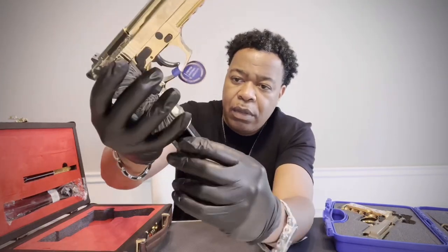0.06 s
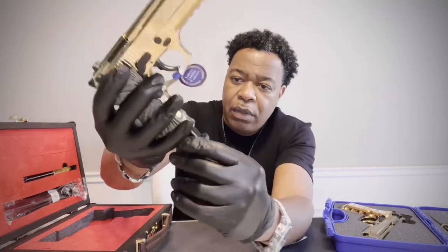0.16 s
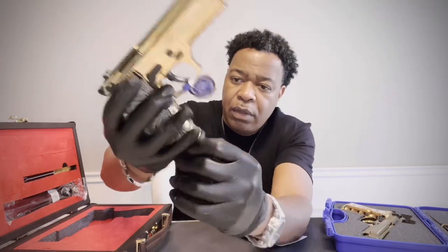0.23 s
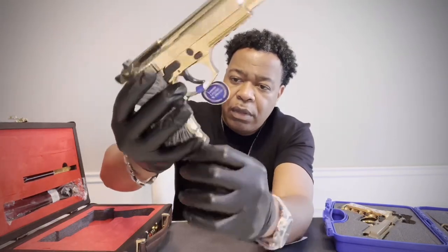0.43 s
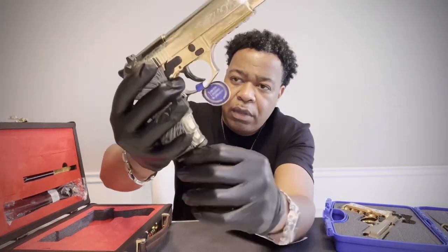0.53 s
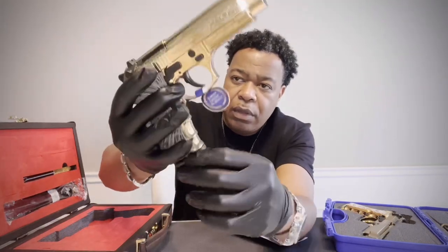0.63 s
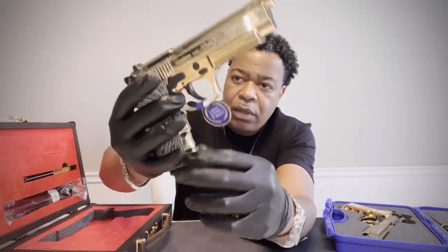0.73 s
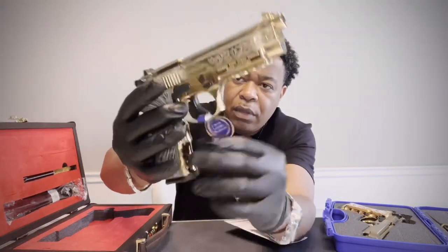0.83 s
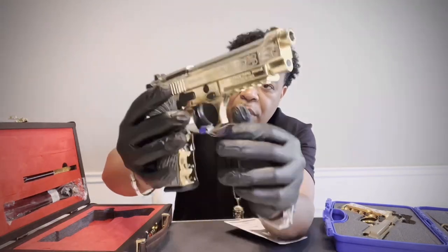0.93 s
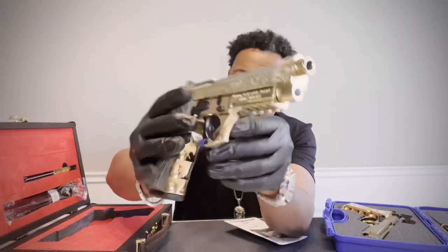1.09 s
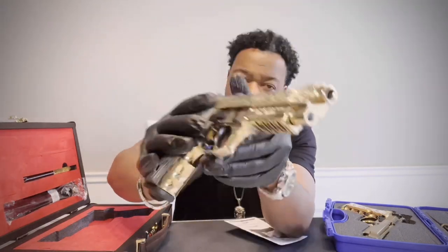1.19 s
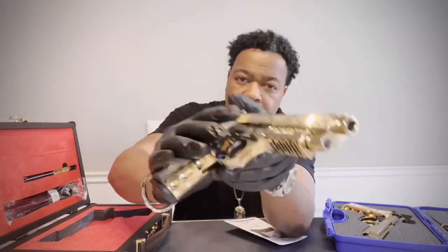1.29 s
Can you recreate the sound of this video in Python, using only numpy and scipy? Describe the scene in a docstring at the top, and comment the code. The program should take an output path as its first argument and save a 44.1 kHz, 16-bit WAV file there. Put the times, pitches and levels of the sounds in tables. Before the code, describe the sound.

Sharp metal double clack of a pistol's magazine, with gloves rubbing softly in a room.

```python
"""Gloves rub softly on metal over a low hum and a faint hiss on the left: a pistol is handled close by.
Its magazine ticks in the grip, catches with a sharp double clack and knocks once more.
Each impact of steel on steel cracks and excites the pistol's modes, which the hand damps quickly,
while the thin magazine rings on. The walls of a bare, lively room answer every click."""
import sys
import numpy as np
from scipy import signal
from scipy.io import wavfile

SR = 44100
rng = np.random.default_rng(int(sys.argv[2]) if len(sys.argv) > 2 else 0)


def dump(signal):
    """Clip the signal to [-1, 1] and save it as 16-bit WAV at the path in sys.argv[1]."""
    limited = np.clip(np.atleast_2d(signal).T, -1, 1)
    pcm = np.round(limited * 32767).astype(np.int16)
    wavfile.write(sys.argv[1], SR, pcm)


N = 59535

# Background rumble. Each row: frequency in Hz, relative spectral density in dB.
RUMBLE_SPECTRUM = [(25, -16.5), (60, -1.5), (100, -4), (180, -4.5), (300, -8), (450, -21), (800, -26.5),
                   (3000, -36), (9000, -28), (15000, -48)]
# Tones of the hum. Each row: frequency in Hz, level in dB.
HUM_TONES = [(59.2, -73.5), (118.4, -79.5), (208.5, -74), (262, -79.5), (322, -80.5)]
# Course of the hiss. Each row: time in seconds, level in dB.
HISS_LEVELS = [(0, -76.5), (.62, -77.5), (.68, -68), (.78, -70), (.86, -74), (.95, -74.5), (1.03, -80),
               (1.12, -79), (1.2, -68), (1.35, -70)]
# Likeness of the two channels in diffuse sound. Each row: frequency in Hz, correlation from -1 to 1.
STEREO_CORRELATION = [(60, 0.87), (250, 0.096), (1000, 0.092), (2500, -0.034), (5000, 0.0048),
                      (8500, -0.44), (14000, 0.42)]
# Course of the gloves' rubbing. Each row: time in seconds, level in dB.
RUB_LEVELS = [(0, -58), (.04, -65.5), (.08, -65.5), (.16, -60), (.22, -48.5), (.5, -70), (.7, -84.5),
              (.8, -76), (.95, -70.5), (1.03, -87.5), (1.115, -80), (1.145, -66), (1.21, -74), (1.35, -72)]
# Quick slips of a glove. Each row: start in seconds, level in dB, rise and decay in seconds.
GLOVE_SLIPS = [(0.721, -59, 0.015, 0.05), (.92, -69, .02, 0.055), (1.128, -63, 0.012, 0.066)]
# Friction noise of rubs and of slips. Each row: frequency in Hz, relative spectral density in dB.
RUB_SPECTRUM = [(400, -14.5), (1000, -1.5), (2500, 2.5), (4000, -1), (6000, 0), (8000, -12.5), (9800, -7.5),
                (12500, -21.5), (14500, -17.5)]
SLIP_SPECTRUM = [(1000, -4), (3000, -12), (4800, 5), (6300, 9), (8000, -18), (9800, 12), (12500, -32),
                 (14500, -6)]
# Near walls. Each row: delay in seconds, gain in dB, left minus right in dB.
WALL_ECHOES = [(0.0111, -11.5, 3.5), (0.0162, -13.5, 4)]
# Reverberation. Each row: frequency in Hz, gain in dB, T60 in seconds, left minus right in dB.
REVERB_BANDS = [(294, 11.5, 0.41, -2), (650, 10, 0.54, 1), (1160, -7, 0.46, 0), (2150, 0.5, .68, -1),
                (3077, 4.5, 0.52, -0.5), (4300, 2, 0.59, 3), (5470, -2, .58, 7), (7493, 4, 0.55, -0.5),
                (9950, -2.5, .45, -1), (12690, -17, .36, 0), (14500, -10.5, 0.21, -1)]
# Modes of the magazine. Each row: frequency in Hz, gain in dB, T60 in seconds.
MAGAZINE_MODES = [(960, -33.5, .5), (2700, -25.5, 0.45), (2866, -21, .5), (3010, -22, 0.59),
                  (3380, -22, .5), (3549, -19.5, .5), (3960, -23, .6), (4420, -26, 0.38), (4500, -24, 0.61),
                  (4990, -26, 0.8), (4880, -21, .5), (5540, -20, 0.65), (6580, -25, .5)]
# Modes of the held pistol. Each row: frequency in Hz, gain in dB, T60 in seconds, left minus right in dB.
PISTOL_MODES = [(707, -20.5, 0.014, -4), (982, -16, 0.0067, 2.5), (1250, -12, .014, 4),
                (1659, -11, 0.0139, 1), (2317, -15, 0.014, -6), (2773, -12, 0.011, 11),
                (3210, -12, 0.005, 10.5), (3934, -5, 0.0075, 9.5), (4615, -7.5, 0.0065, 9),
                (5268, -3.5, 0.0042, 12), (6975, -12, 0.0033, 6.5), (9120, -19, 0.0068, -2.5),
                (9780, -9, 0.00924, 2), (14300, -12, 0.015, -6)]
# Steel impacts. Each row: time in seconds, level in dB, bass and treble gains in dB, two favoured
# pitches (each in Hz, then its lift in dB), chatter decay in seconds, chatter gain in dB.
IMPACTS = [(0.0930, -45.5, 10, -2, 4160, 8.1, 1083, 11.1, 0.0017, 7),
           (0.156, -52.5, 10.5, -10, 5540, 4.5, 3600, 4.9, 0.013, 2),
           (0.209, -54, 8, -8, 1650, 10.4, 2320, 7.7, 0.0013, 5),
           (0.2298, -32.5, 2.5, 1, 5350, 5.5, 2280, 4.4, .0010, 8),
           (0.2446, -23, -4.5, 2, 4610, 3.5, 3280, 3, 0.00077, -0.5),
           (0.5097, -49, 12, -11, 5290, 4.74, 2200, 7.1, 0.0054, -3)]

IMPACT_SCALE = np.sqrt(SR / 100)   # an impulse with the energy of 10 ms at rms 1
FIRST_TOUCH_S, FIRST_TOUCH_DB = .0006, -17.5   # lead and level against the main blow
BASS_HZ, BODY_HZ, TREBLE_HZ = 1022, 3330, 10200
CRACK_DB, CRACK_LOW_HZ = -7, 1500
ROOM_CRACK_DB = 8.5   # the crack spreads to the walls more strongly than the ring
TIME = np.arange(N) / SR


def from_db(db):
    """Amplitude grows tenfold for every 20 dB."""
    return 10 ** (np.asarray(db) / 20)


def unit_rms(x):
    """Normalisation to a mean power of 1."""
    return x / np.sqrt(np.mean(x ** 2) + 1e-20)


def unit_energy(x):
    """Normalisation to a mean energy of 1 per channel."""
    return unit_rms(x) / np.sqrt(x.shape[-1])


def pan(db):
    """A level difference, left minus right, gives a sound its direction."""
    return from_db(np.array([[db], [-db]]) / 2)


def level_curve(rows):
    """An amplitude envelope, interpolated in decibels."""
    return from_db(np.interp(TIME, *np.transpose(rows)))


def at_hz(rows, hz):
    """Interpolation of a table's columns on a logarithmic frequency axis."""
    frequencies, *columns = np.transpose(rows)
    return [np.interp(np.log(hz), np.log(frequencies), column) for column in columns]


def drift(rate_hz):
    """Random modulation: Gaussian values joined by straight lines."""
    return np.interp(TIME * rate_hz, np.arange(4096), rng.standard_normal(4096))


def delayed(x, delay_s):
    """Propagation delays a sound without changing its shape."""
    return np.pad(x, ((0, 0), (int(delay_s * SR), 0)))[:, :N]


def resonance(force, hz, t60):
    """A damped oscillator, whose free vibration falls 60 dB in t60 seconds."""
    radius = from_db(-60 / (t60 * SR))
    feedback = [1, -2 * radius * np.cos(2 * np.pi * hz / SR), radius ** 2]
    return signal.lfilter([1, 0, -1], feedback, force + 1e-18)


def noise_bands():
    """Partly correlated stereo noise in third octaves; yields each centre in Hz and its band."""
    edges = 22 * 2 ** (np.arange(30) / 3)
    white = rng.standard_normal((2, 2, N + SR // 2))
    for k, (low, high) in enumerate(zip(edges, edges[1:])):
        bandpass = signal.butter(2, [low, high], "band", fs=SR, output="sos")
        mid, side = signal.sosfilt(bandpass, white[k % 2])[:, -N:]
        hz = np.sqrt(low * high)
        alike = np.clip(at_hz(STEREO_CORRELATION, hz)[0], -1, 1)
        yield hz, np.sqrt((1 + alike) / 2) * mid + np.sqrt((1 - alike) / 2) * side * [[1], [-1]]


def coloured_noise(spectrum):
    """Spectral shaping: weighted bands add up to stereo noise of rms 1."""
    return unit_rms(sum(from_db(at_hz(spectrum, hz)[0]) * band for hz, band in noise_bands()))


def rumble(level_db=-64.5):
    """Stationary noise, densest at low frequencies, forms the room's background."""
    return from_db(level_db) * pan(db=2.5) * coloured_noise(RUMBLE_SPECTRUM)


def hum(waver_db=2.5):
    """Slow amplitude modulation makes each low tone waver."""
    tones = np.zeros(N)
    for hz, db in HUM_TONES:
        amplitude = np.sqrt(2) * from_db(db + waver_db * drift(rate_hz=7))
        tones += amplitude * np.sin(2 * np.pi * (hz * TIME + rng.random()))
    return pan(db=13) * tones


def hiss(centre_hz=1700, width_hz=423):
    """Narrow-band noise swells and fades on the left."""
    edges = [centre_hz - width_hz / 2, centre_hz + width_hz / 2]
    bandpass = signal.butter(2, edges, "band", fs=SR, output="sos")
    noise = unit_rms(signal.sosfilt(bandpass, rng.standard_normal((2, N))))
    return level_curve(HISS_LEVELS) * pan(db=16) * noise


def gloves(grain_db=3):
    """Sliding friction of rubber on metal makes grainy noise, brighter in the quick slips."""
    slip_envelope = np.zeros(N)
    for start, db, rise, decay in GLOVE_SLIPS:
        attack = np.clip((TIME - start) / rise, 0, 1)
        release = np.exp(-np.maximum(TIME - start - rise, 0) / decay)
        slip_envelope += from_db(db) * attack * release
    rubbing = level_curve(RUB_LEVELS) * coloured_noise(RUB_SPECTRUM)
    slipping = slip_envelope * coloured_noise(SLIP_SPECTRUM)
    grain = from_db(grain_db * drift(rate_hz=300))
    return grain * pan(db=6.5) * (rubbing + slipping)


def reverberation(x, delay_s=.0115, early_db=-9.5, early_t60=0.28):
    """Diffuse reflections decay exponentially: an early burst, and a tail shortest in the top treble."""
    early = from_db(early_db - 60 * TIME / early_t60)
    response = np.zeros((2, N))
    for hz, band in noise_bands():
        db, t60, pan_db = at_hz(REVERB_BANDS, hz)
        tail = from_db(-60 * TIME / t60)
        response += from_db(db) * pan(pan_db) * unit_energy(early + tail) * band
    mono = x.mean(axis=0, keepdims=True)
    return delayed(signal.fftconvolve(mono, response, axes=1), delay_s)


def wall_echoes(x):
    """Specular reflection: each near wall returns one weaker, later copy."""
    return sum(from_db(db) * pan(pan_db) * delayed(x, delay_s) for delay_s, db, pan_db in WALL_ECHOES)


def scattering(x, gain_db=-6, t60=0.057, top_hz=8200):
    """Hands, table and cases scatter the sound into a short, dense spray of reflections."""
    t = np.arange(SR // 8) / SR
    spray = rng.standard_normal((2, len(t))) * from_db(-60 * t / t60)
    lowpass = signal.butter(2, top_hz, fs=SR, output="sos")
    response = signal.sosfilt(lowpass, unit_energy(spray))
    return from_db(gain_db) * signal.fftconvolve(x, response, axes=1)[:, :N]


def magazine_ring():
    """Lightly damped modes of thin steel ring on faintly after every impact."""
    blows = np.zeros(N)
    for time_s, db, *_ in IMPACTS:
        blows[int(time_s * SR)] = from_db(db) * IMPACT_SCALE
    rings = sum(from_db(db) * unit_energy(resonance(blows, hz, t60)) for hz, db, t60 in MAGAZINE_MODES)
    return pan(db=2.5) * np.linalg.norm(blows) * rings


def contact_force(chatter_s, chatter_db, stereo_spread=.25, samples=4096):
    """Steel meets steel in a light first touch, an impulsive blow and a dying chatter."""
    t = np.arange(samples) / SR
    mid, side = rng.standard_normal((2, samples))
    envelope = np.minimum(t / FIRST_TOUCH_S, 1) * np.exp(-t / chatter_s)
    chatter = envelope * (mid + stereo_spread * side * [[1], [-1]])
    force = from_db(chatter_db) * unit_energy(chatter)
    force[:, 0] += from_db(FIRST_TOUCH_DB)
    force[:, int(FIRST_TOUCH_S * SR)] += 1
    return force


def coupling(hz, favoured_hz, width_octaves=0.24):
    """A contact point favours modes near one pitch: the weight is 1 there and falls towards 0."""
    return np.exp(-(np.log2(hz / favoured_hz) / width_octaves) ** 2)


def pistol_impacts():
    """Modal excitation: each impact cracks, and its position decides which modes ring most."""
    rings, cracks = np.zeros((2, 2, N + SR))
    highpass = signal.butter(2, CRACK_LOW_HZ, "high", fs=SR, output="sos")
    for time_s, db, bass_db, treble_db, *favoured, chatter_s, chatter_db in IMPACTS:
        first_hz, first_db, second_hz, second_db = favoured
        force = contact_force(chatter_s, chatter_db)
        start = int((time_s - FIRST_TOUCH_S) * SR)
        span = slice(start, start + force.shape[1])
        gain = from_db(db) * IMPACT_SCALE
        crack = unit_energy(signal.sosfilt(highpass, force))
        cracks[:, span] += gain * from_db(CRACK_DB + treble_db) * crack
        for k, (hz, mode_db, t60, pan_db) in enumerate(PISTOL_MODES):
            tilt_db, = at_hz([(BASS_HZ, bass_db), (BODY_HZ, 0), (TREBLE_HZ, treble_db)], hz)
            lift_db = first_db * coupling(hz, first_hz) + second_db * coupling(hz, second_hz)
            mode = unit_energy(resonance(force, hz, t60)) * (-1) ** k   # neighbours alternate in sign
            rings[:, span] += gain * from_db(mode_db + tilt_db + lift_db) * pan(pan_db) * mode
    return rings[:, :N], cracks[:, :N]


def scene():
    """Superposition of the direct clicks, their reflections, the gloves and the background."""
    rings, cracks = pistol_impacts()
    clicks = rings + cracks
    towards_walls = rings + from_db(ROOM_CRACK_DB) * cracks
    reflections = scattering(clicks) + wall_echoes(clicks) + reverberation(towards_walls)
    return clicks + magazine_ring() + reflections + gloves() + hum() + hiss() + rumble()


def record(dry):
    """Clipping stops peaks at full scale; a steep low-pass then limits the bandwidth."""
    stopband_hz = 17278
    lowpass = signal.cheby2(12, 70, stopband_hz, fs=SR, output="sos")
    return signal.sosfilt(lowpass, np.clip(dry, -1, 1))


dry = scene()
out = record(dry)
dump(out)
```